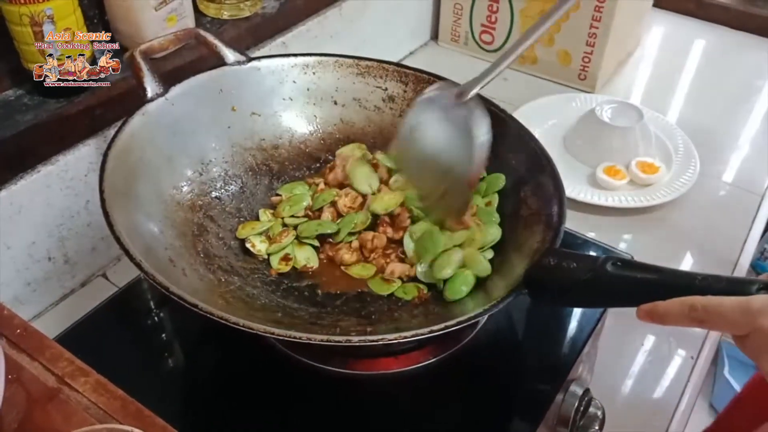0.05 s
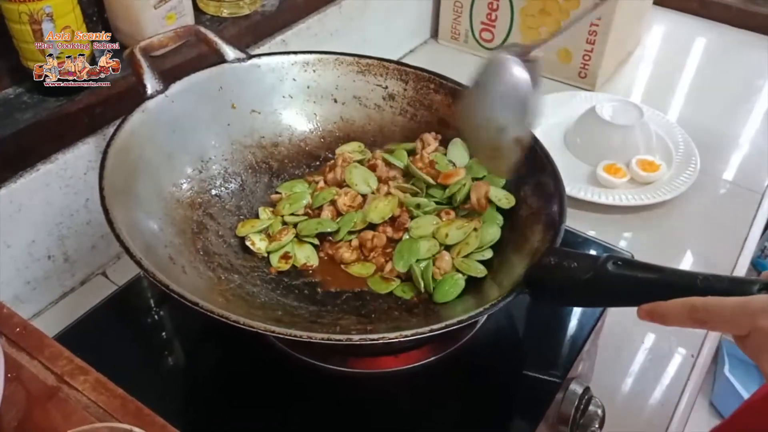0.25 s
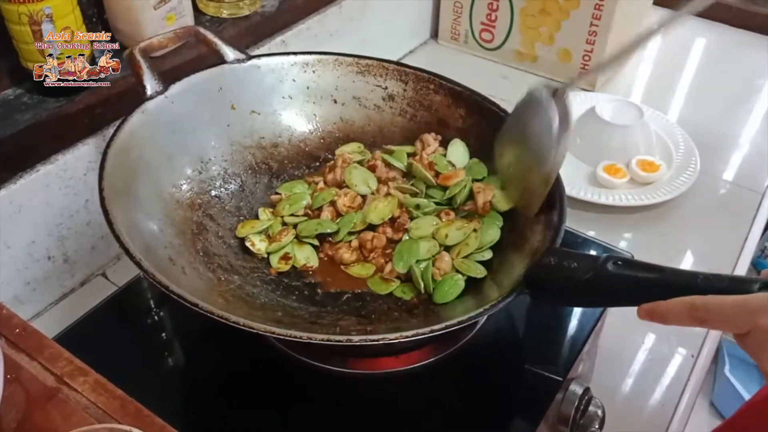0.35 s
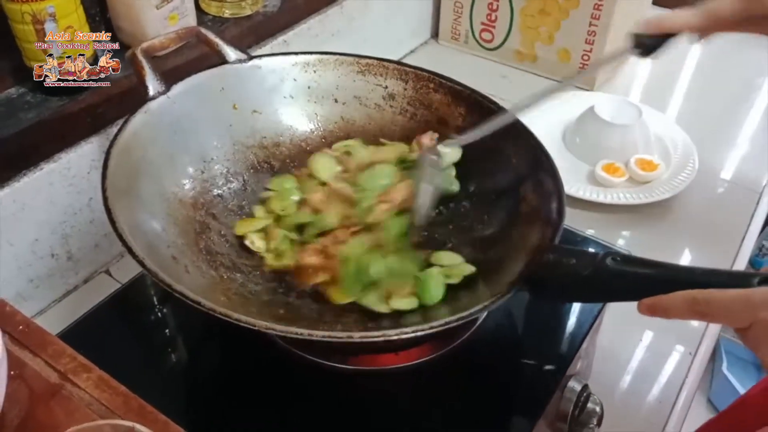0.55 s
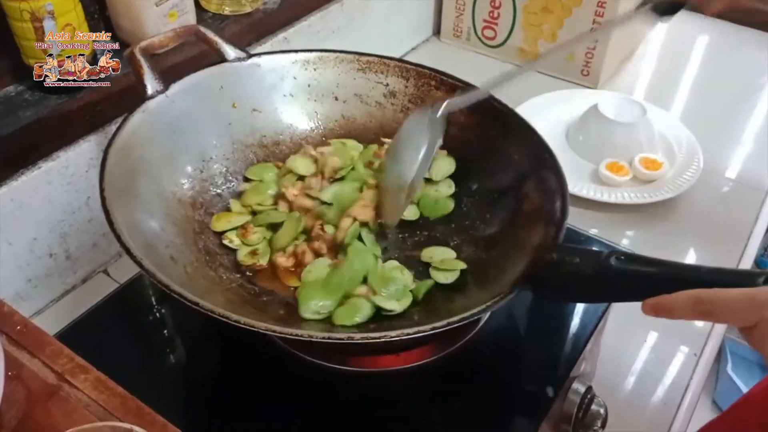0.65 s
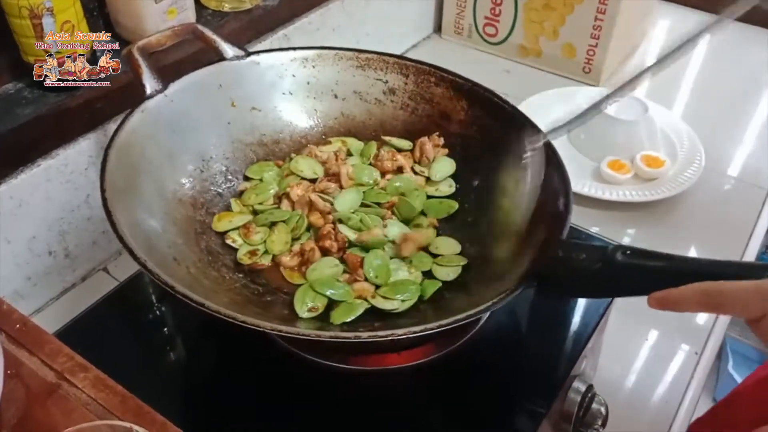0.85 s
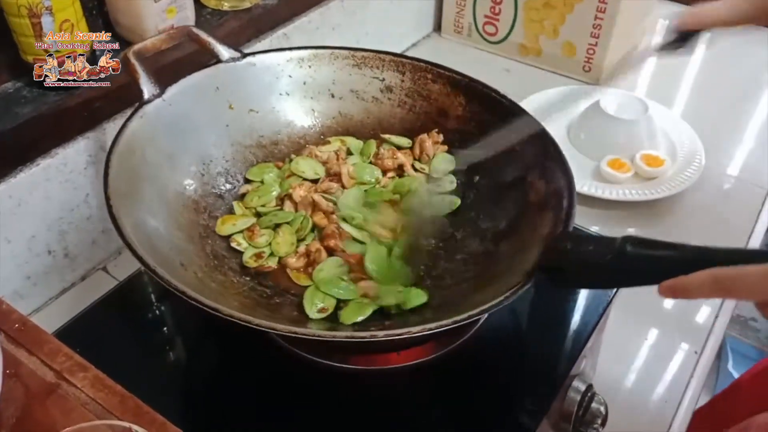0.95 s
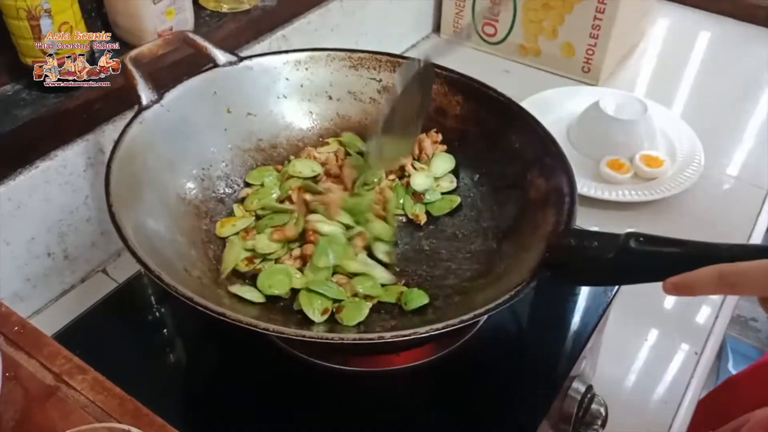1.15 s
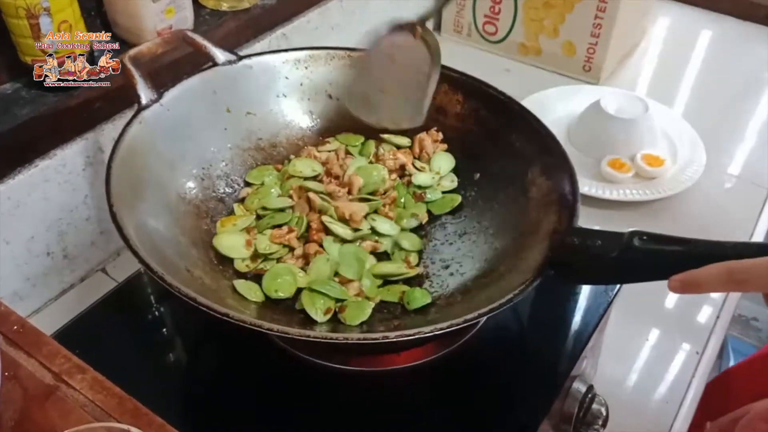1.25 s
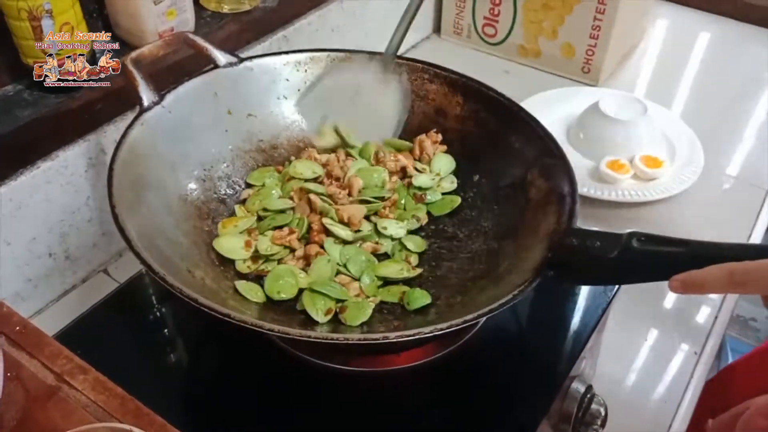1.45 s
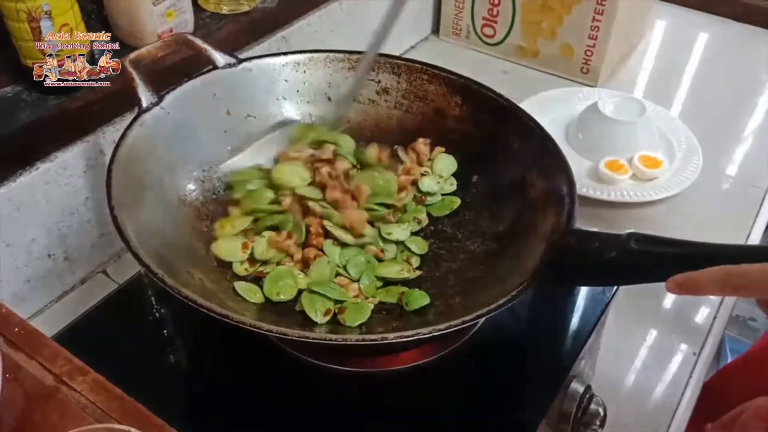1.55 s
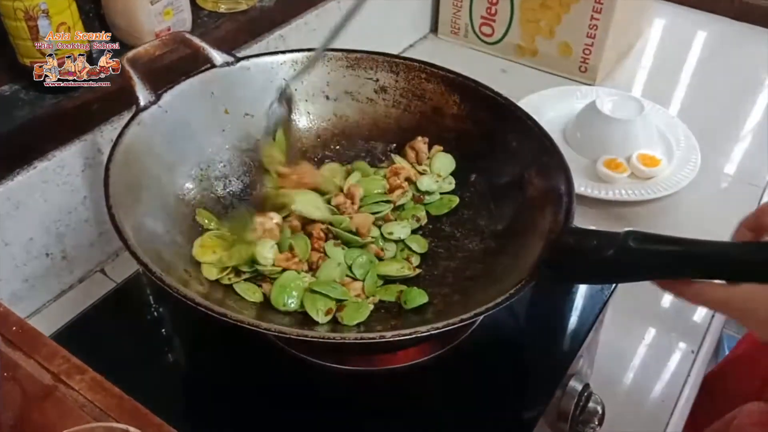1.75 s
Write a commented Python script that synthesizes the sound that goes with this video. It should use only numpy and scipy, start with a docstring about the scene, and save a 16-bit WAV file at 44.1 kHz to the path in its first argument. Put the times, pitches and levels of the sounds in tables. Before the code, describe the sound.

Close up in a hard-walled kitchen, faint frying and a wet squelch come first, then uneven metal spatula clanks and rough scrapes ring in a wok, ending with soft food patter and oil pops.

```python
"""Faint sizzle, a squelch and soft flops of food, then a steel spatula clanks on a hot wok in a tiled kitchen.
It clanks four times: cracks, dense ringing and modes of pan and blade. Three of the blows run on into a
gritty scrape of random slips with a sinking, rough blade tone. Food flops back between the strokes as
soft bursts of clicks. Frying is steady coloured noise under bubble clicks and a few pops of oil."""
import sys
import numpy as np
from scipy import signal
from scipy.io import wavfile
from scipy.ndimage import uniform_filter1d

SR = 44100
rng = np.random.default_rng(int(sys.argv[2]) if len(sys.argv) > 2 else 0)


def pcm_store(signal):
    """Save signal as 16-bit PCM."""
    levels = np.round(np.clip(np.atleast_2d(signal), -1, 1) * 32767)
    wavfile.write(sys.argv[1], SR, levels.astype(np.int16).T)


N = 79380

# modes of the wok: mode_hz, relative_db, t60_s
WOK_MODES = [(275.9, -8.5, 0.38), (315.4, -6, 0.23), (402.4, -6, 0.16), (639, -6, 0.29), (700, -3.5, 0.12),
             (771.4, -6, 0.19), (1093, -5.5, 0.31), (1282, -2, 0.21), (1331.6, -3.5, 0.21),
             (1356, -11.5, 0.29), (1414, -5.5, 0.21), (1682, -6.5, .25), (1703, -2.5, 0.17)]
# spectrum of steel grit: freq_hz, relative_db
GRIT_SPECTRUM = [(1530, -23.5), (2600, -1), (2800, -2.5), (3040, -5), (3450, -6), (3720, -3), (3980, -4),
                 (8590, -3), (13700, -9.5), (15500, -20)]
# spectrum of the wok body: freq_hz, relative_db
BODY_SPECTRUM = [(60, -21), (150, -6.5), (290, -16.5), (420, 8), (620, 5), (950, 2), (1320, 1), (1800, 7),
                 (2500, -3.5), (4000, -25)]


def amp(db):
    """Decibels to gain."""
    return 10 ** (np.asarray(db) / 20)


def unit(x):
    """Scales to rms 1."""
    return x / np.sqrt(np.mean(x ** 2) + 1e-20)


def read(points, hz):
    """Interpolates a table on a log-frequency axis."""
    f, value = np.transpose(points)
    return np.interp(np.log(hz + 1), np.log(f + 1), value)


def add(mix, start_s, sound):
    """Mixes a sound in at a time."""
    part = mix[max(round(start_s * SR), 0):][:len(sound)]
    part += sound[:len(part)]


def colour(x, points, size=4096):
    """Minimum-phase filter of energy 1 with the given spectrum."""
    hz = abs(np.fft.fftfreq(size, 1 / SR))
    log_gain = np.log(amp(read(points, hz)))
    spectrum = np.exp(np.conj(signal.hilbert(log_gain)))
    taps = np.fft.ifft(spectrum).real[:size // 2]
    return signal.fftconvolve(x, taps / np.linalg.norm(taps))[:len(x)]


def tail(t60, size=22050):
    """Dense ringing of energy 1: noise with each band dying at its own speed."""
    hz, t, bands = signal.stft(rng.standard_normal(size), SR, nperseg=128)
    decay = amp(-60 * t / read(t60, hz)[:, None])
    out = signal.istft(bands * decay, SR, nperseg=128)[1]
    return out / np.linalg.norm(out)


def ring(modes, size=26000):
    """Sum of decaying modes that start in alternate directions."""
    t = np.arange(size) / SR
    out = np.zeros(size)
    for k, (hz, db, t60_s) in enumerate(modes):
        decay = np.exp(-np.log(1000) * t / t60_s)
        out += (-1) ** k * amp(db) * decay * np.sin(2 * np.pi * hz * t)
    return out


def clicks(per_s, spread_db):
    """Random clicks of either sign and uneven size, rms 1."""
    hits = rng.random(N) < per_s / SR
    signs = rng.choice([-1, 1], N)
    sizes = amp(spread_db * np.minimum(rng.exponential(1, N), 4))
    return unit(hits * signs * sizes)


def wobble(count=260):
    """Quick random drift of rms 1: noise averaged twice over count samples."""
    once = uniform_filter1d(rng.standard_normal(N), count)
    return unit(uniform_filter1d(once, count))


def resonate(x, hz, width_hz):
    """A resonance that follows a pitch curve: shift to 0 Hz, lowpass, shift back."""
    turn = np.exp(2j * np.pi * np.cumsum(hz) / SR)
    r = np.exp(-np.pi * width_hz / SR)
    return 2 * (turn * signal.lfilter([1 - r], [1, -r], x / turn)).real


def push(t, rise_s, hold_s, release_s):
    """Force of the hand: a quick rise, a hold and a fade."""
    release_db = 37  # fall per release_s
    return np.clip(t / rise_s, 0, 1) * amp(-release_db * np.maximum(t - hold_s, 0) / release_s)


def blows():
    """Blade meets wok: a short crack, a dense clank and clearer modes of both; catches are small knocks."""
    # start_s, relative_db, clang_db, clack_db, treble_db, wok_ring_db, favoured_hz, blade_hz, blade_ring_db
    # the spot struck favours some pan modes; the blade pitch depends on how it lands
    blow_rows = [(0.2441, -2.5, -2, -0.5, 1, -4.5, 1080, 2660, -23),
                 (0.2507, -5, -3, -1.5, 5.5, -7, 1250, 1900, -23),
                 (0.7656, -3, -4.5, 0.5, 0.5, -6.5, 635, 1602, -19),
                 (0.7693, -6.5, -3, -2.5, -0.5, -12.5, 1270, 1460, -25),
                 (1.1498, -2.5, 1.5, -2.5, -0.5, -2, 713, 1715, -20),
                 (1.2974, -9.5, -3, -0.5, 4, -6, 310, 2320, -19),
                 (1.3015, -4.5, -6, 0, -0.5, -6.5, 1330, 2050, -27)]
    # blade catching as it slides: start_s, relative_db
    catch_rows = [(0.3194, -6), (0.3525, -12.5), (0.8001, -30), (1.4337, -13.5)]
    # modes of the spatula: mode_hz, relative_db, t60_s
    spatula_modes = [(5020, -6, 0.1), (6250, -4, .14), (6640, -8, 0.14), (7690, -4, 0.39), (8270, -3, 0.19),
                     (8430, -8, .12), (9000, 1, 0.24), (9870, -5, 0.079), (11400, 0, 0.18)]
    # low, middle and high spectra of the dense ring: freq_hz, relative_db
    clang_spectrum = [(40, -18), (110, -22), (200, -4), (400, 0), (700, 2), (950, -1), (1350, 5.5),
                      (1750, -2.5), (2200, -28), (5000, -34)]
    clack_spectrum = [(300, -49.5), (1500, -2.5), (2300, -0.5), (3400, -0.5), (4700, 0.5), (7000, -2),
                      (15000, -28)]
    clink_spectrum = [(1500, -49), (4000, -4.5), (5800, -22), (6800, 9), (8000, 3), (9300, 7.5), (10700, 0),
                      (12000, 4.5), (14000, 1), (15500, -14.5)]
    # decay of the dense ring: freq_hz, t60_s
    clank_decay = [(150, 0.29), (600, 0.29), (1600, 0.12), (3500, 0.18), (9000, 0.056), (15000, 0.024)]
    clang_gain_db, clack_gain_db, clink_gain_db = 5, 7.5, 11.5
    wok_gain_db, spatula_gain_db = -24.5, -30
    crack_db, crack_decay_s, clang_rise_s = -6.5, 0.0066, 0.0031
    spot_boost_db, spot_width_octaves, blade_t60_s = 8.5, 0.098, 0.1

    out, t = np.zeros(N), np.arange(20000) / SR
    for start_s, db, clang_db, clack_db, treble_db, ring_db, spot_hz, blade_hz, blade_db in blow_rows:
        clank = tail(clank_decay)[:len(t)]
        crack = rng.standard_normal(len(t)) * np.exp(-t / crack_decay_s)
        sharp = clank + amp(crack_db) * crack / np.linalg.norm(crack)
        soft = clank * np.minimum(t / clang_rise_s, 1)
        add(out, start_s, amp(db + clang_gain_db + clang_db) * colour(soft, clang_spectrum))
        add(out, start_s, amp(db + clack_gain_db + clack_db) * colour(sharp, clack_spectrum))
        add(out, start_s, amp(db + clink_gain_db + treble_db) * colour(sharp, clink_spectrum))

        struck_modes = []
        for hz, mode_db, t60_s in WOK_MODES:
            octaves_off = np.log2(hz / spot_hz)
            boost_db = spot_boost_db * np.exp(-(octaves_off / spot_width_octaves) ** 2)
            struck_modes.append((hz, mode_db + boost_db, t60_s))
        add(out, start_s, amp(wok_gain_db + ring_db) * ring(struck_modes))
        add(out, start_s, amp(spatula_gain_db + db + treble_db) * ring(spatula_modes))
        add(out, start_s, ring([(blade_hz, blade_db, blade_t60_s)]))

    for start_s, db in catch_rows:
        knock = tail([(300, 0.06), (9000, 0.068)])  # freq_hz, t60_s
        low, high = amp(7) * colour(knock, BODY_SPECTRUM), amp(6) * colour(knock, GRIT_SPECTRUM)
        add(out, start_s, amp(db) * (low + high))
    return out


def scrapes(size=20000):
    """Tiny slips of steel on steel: along the push the grit swells or thins and the pan's body fades."""
    # start_s, hold_s, release_s, grit_end_db, grit_swell_db, body_start_db
    scrape_rows = [(0.269, 0.063, 0.027, -30.5, -2.5, -31), (0.316, 0.076, 0.13, -25.5, -1.5, -29),
                   (0.785, 0.078, 0.069, -28, -1.5, -27), (1.315, 0.078, 0.22, -25, 5, -29.5)]
    slips_per_s, slip_spread_db = 4200, 3
    rise_s, chatter_rms_db, body_sag_db = 0.019, 1, 5
    edge_share, wok_ring_share = 0.82, 0.55

    out, t = np.zeros(N), np.arange(size) / SR
    for start_s, hold_s, release_s, grit_db, swell_db, body_db in scrape_rows:
        along = np.clip(t / hold_s, 0, 1)
        chatter = amp(chatter_rms_db * wobble()[:size])
        force = push(t, rise_s, hold_s, release_s) * chatter
        slips = clicks(slips_per_s, slip_spread_db)[:size]
        grit = unit(colour(slips + edge_share * unit(edge(slips, along)), GRIT_SPECTRUM))
        wok_ring = unit(signal.fftconvolve(slips, ring(WOK_MODES))[:size])
        body = unit(unit(colour(slips, BODY_SPECTRUM)) + wok_ring_share * wok_ring)
        grit_gain = amp(grit_db - swell_db * (1 - along))
        body_gain = amp(body_db - body_sag_db * along)
        add(out, start_s, force * (grit_gain * grit + body_gain * body))
    return out


def edge(slips, along, count=26):
    """Upper resonances of the blade's edge; they differ with each grip and drift along the push."""
    width_hz, grip_spread, max_drift = 75, 0.036, 0.048  # spread and drift as fractions of pitch
    rows = rng.uniform(-0.97, 1, (count, 2))
    out = 0
    for hz, (off, drift) in zip(np.linspace(2900, 14200, count), rows):
        pitch_hz = hz * (1 + grip_spread * off) * (1 + max_drift * drift * along)
        out = out + resonate(slips, pitch_hz, width_hz)
    return out


def squeals():
    """Friction keeps the blade singing, a rough tone that sinks as the contact shifts."""
    # start_s, hold_s, release_s, level_db, first_hz, last_hz, glide_s
    squeal_rows = [(0.317, 0.053, 0.035, -30, 2580, 2275, 0.044),
                   (0.338, 0.021, 0.12, -34.5, 3100, 2970, 0.0175),
                   (0.799, 0.042, 0.04, -37.5, 1500, 1290, 0.051),
                   (1.325, 0.041, 0.12, -27, 2110, 2024, 0.0255)]
    rise_s, jitter_rms, flutter_max_db = .012, .014, 3.5  # jitter as a fraction of pitch
    fuzz_share, fuzz_width_hz = .7, 250

    out = np.zeros(N)
    for start_s, hold_s, release_s, db, first_hz, last_hz, glide_s in squeal_rows:
        t = np.arange(N) / SR - start_s
        hz = first_hz + (last_hz - first_hz) * np.clip(t / glide_s, 0, 1)
        rough_hz = hz * (1 + jitter_rms * wobble(count=90))
        flutter = amp(flutter_max_db * np.tanh(wobble(count=160)))
        tone = np.sin(2 * np.pi * np.cumsum(rough_hz) / SR) * flutter
        fuzz = resonate(rng.standard_normal(N), hz, fuzz_width_hz)
        fuzz = resonate(fuzz, hz, fuzz_width_hz)
        force = push(t, rise_s, hold_s, release_s)
        out += amp(db) * force * unit(unit(tone) + fuzz_share * unit(fuzz))
    return out


def food():
    """Soft pieces patter on the pan and the blade squelches through them: swelling bursts of clicks."""
    # food falling back: start_s, length_s, relative_db
    flop_rows = [(0.055, 0.062, -44), (0.485, 0.055, -55), (0.915, 0.027, -39), (0.98, 0.034, -43),
                 (1.715, 0.036, -45.5), (1.748, 0.028, -39)]
    # blade sliding through wet food: start_s, length_s, relative_db
    slide_rows = [(-0.03, 0.32, -41), (0.68, 0.091, -51), (1.66, 0.083, -50)]
    # spectra: freq_hz, relative_db
    flop_spectrum = [(50, -7), (150, -16), (300, 8), (450, -2), (650, -5.5), (1100, -7.5), (2500, -74),
                     (8000, -48)]
    slide_spectrum = [(200, -3), (900, -2), (1800, 4.5), (2600, 7.5), (4000, 0.5), (8000, -3), (15000, -19)]

    t, out = np.arange(N) / SR, np.zeros(N)
    for rows, spectrum in (flop_rows, flop_spectrum), (slide_rows, slide_spectrum):
        for start_s, length_s, db in rows:
            phase = np.pi * np.clip((t - start_s) / length_s, 0, 1)
            swell = np.sqrt(np.maximum(np.sin(phase), 0))
            out += amp(db) * colour(swell * clicks(1500, 1), spectrum)
    return out


def oil():
    """Small bubbles burst all the time, with a few louder pops."""
    # pops of hot oil: start_s, relative_db
    pop_rows = [(0.0233, -10), (0.197, -9), (0.6275, -18), (0.6529, -14), (1.6033, -10), (1.6711, -9)]
    # spectrum of a burst: freq_hz, relative_db
    bubble_spectrum = [(500, -23), (2500, 1.5), (5000, -7), (9000, -1.5), (12500, -1.5), (14500, -4),
                       (15500, 1)]
    bubbles_db, bubbles_per_s, spread_db, pop_t60_s = -52, 2200, 1, .018

    bursts = amp(bubbles_db) * clicks(bubbles_per_s, spread_db)
    for start_s, db in pop_rows:
        add(bursts, start_s, amp(db) * tail([(1000, pop_t60_s)]))
    return colour(bursts, bubble_spectrum)


def hiss():
    """Coloured noise: the even wash of frying over the low rumble of the kitchen."""
    # freq_hz, relative_db
    sizzle_spectrum = [(20, -8), (45, -2.5), (85, 0.5), (180, -2), (380, -6.5), (620, 0), (850, -4),
                       (1100, -4.5), (2700, -5), (4600, -11.5), (9000, -8.5), (13000, -11.5), (15500, -33)]
    level_db, swell_rms_db = -46, .7
    wash = unit(colour(rng.standard_normal(2 * N), sizzle_spectrum)[N:])
    return amp(level_db) * wash * amp(swell_rms_db * wobble(count=900))


def scene():
    """Everything in the pan with the kitchen's short echo, a dense decaying tail; the hiss stays dry."""
    # decay of the room: freq_hz, t60_s
    room_decay = [(150, 0.69), (1000, 0.34), (5000, 0.39), (15000, 0.13)]
    room_db, delay_s = -8.5, .006
    pan = blows() + scrapes() + squeals() + food() + oil()
    echo = signal.fftconvolve(pan, tail(room_decay))[:N]
    add(pan, delay_s, amp(room_db) * echo)
    return (pan + hiss())[None]


def record(dry):
    """Drops the deepest bass, rounds off the highest peaks and limits the band."""
    bass_cut_hz, ceiling, cutoff_hz = 36, .74, 15500
    thin = signal.sosfilt(signal.butter(3, bass_cut_hz, "highpass", fs=SR, output="sos"), dry)
    held = thin / (1 + (thin / ceiling) ** 4) ** .25
    lowpass = signal.firwin(301, cutoff_hz, window=("kaiser", 8), fs=SR)
    return signal.oaconvolve(held, lowpass[None], "same")


dry = scene()
out = record(dry)
pcm_store(out)
```